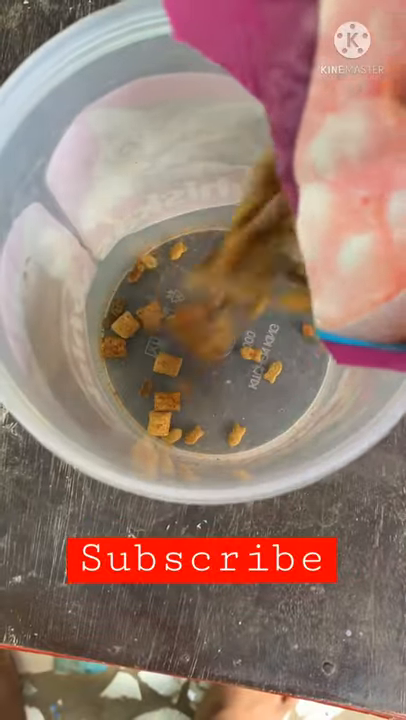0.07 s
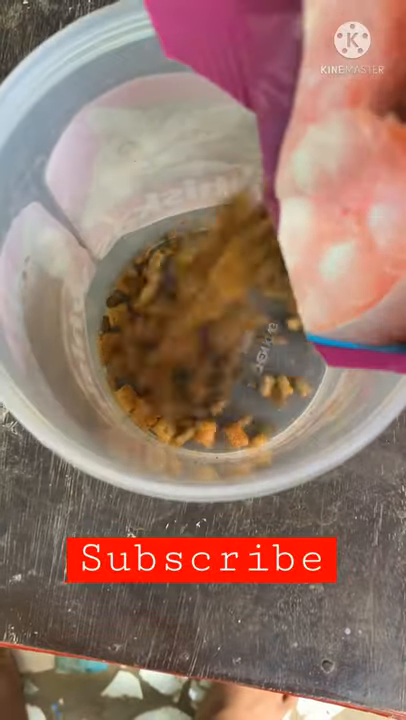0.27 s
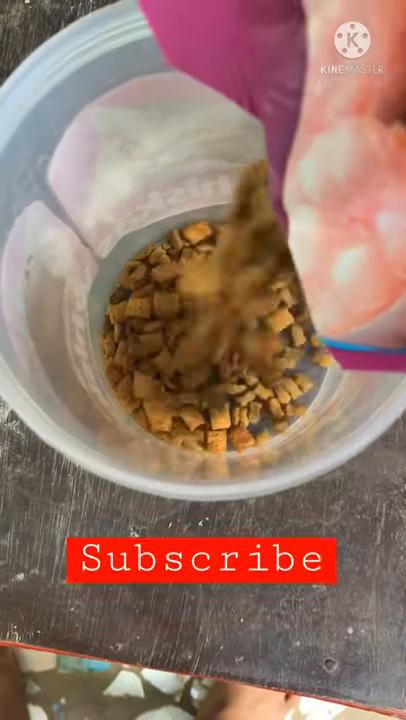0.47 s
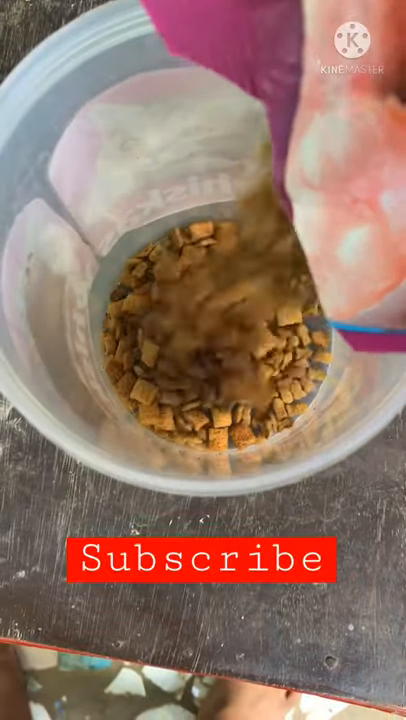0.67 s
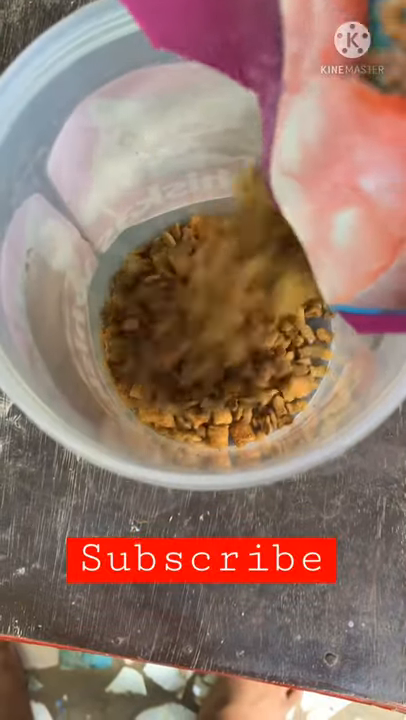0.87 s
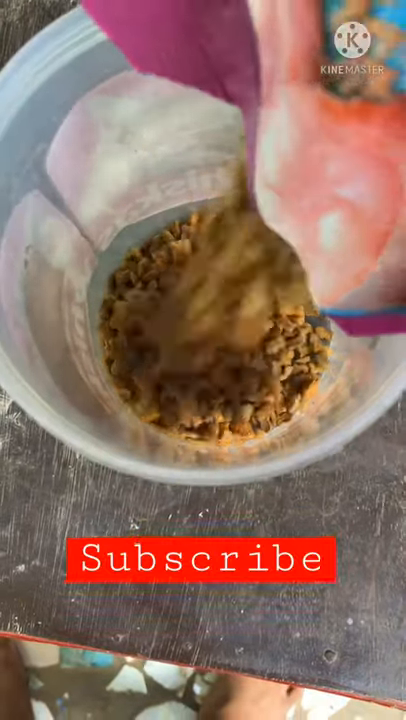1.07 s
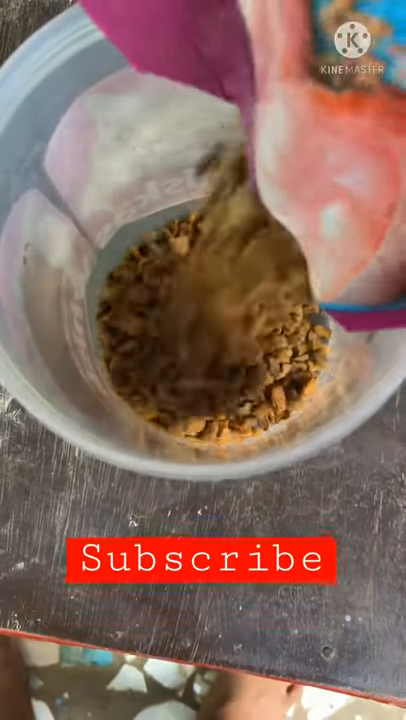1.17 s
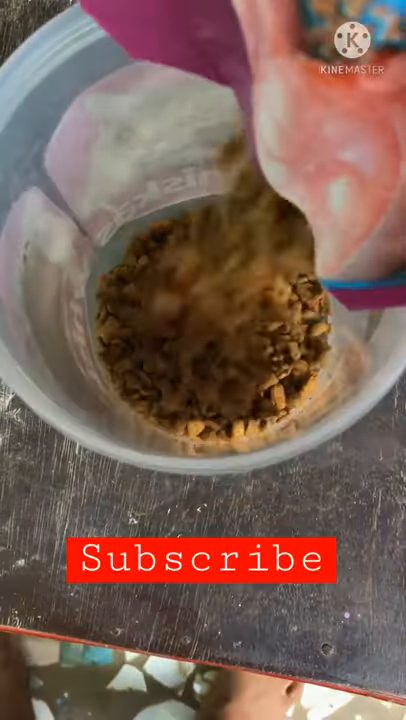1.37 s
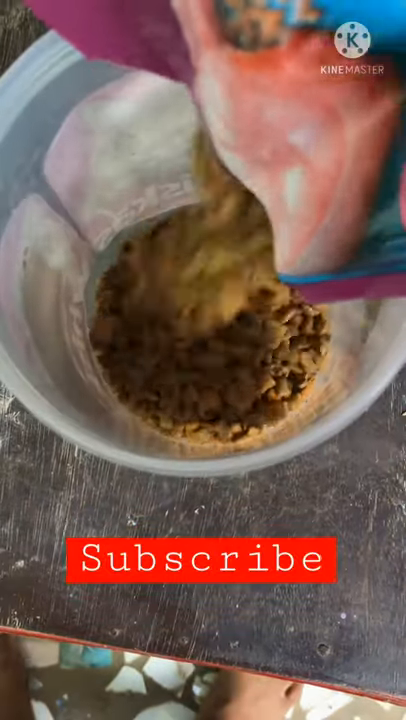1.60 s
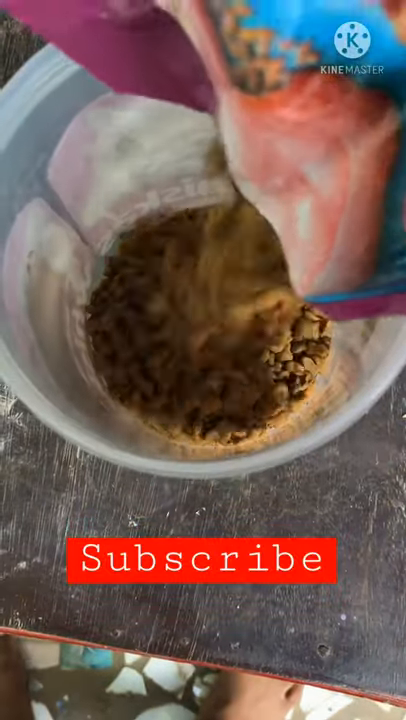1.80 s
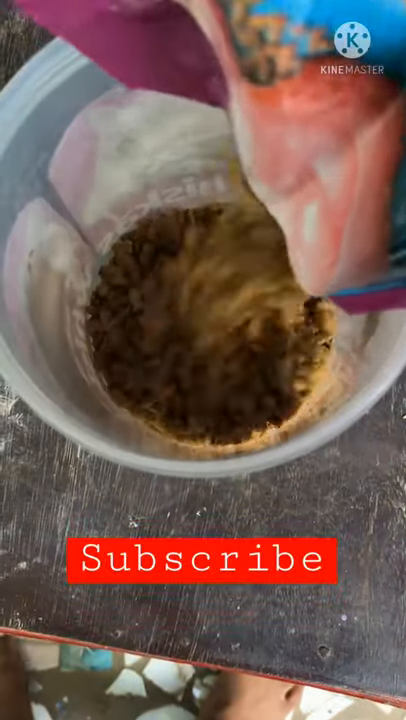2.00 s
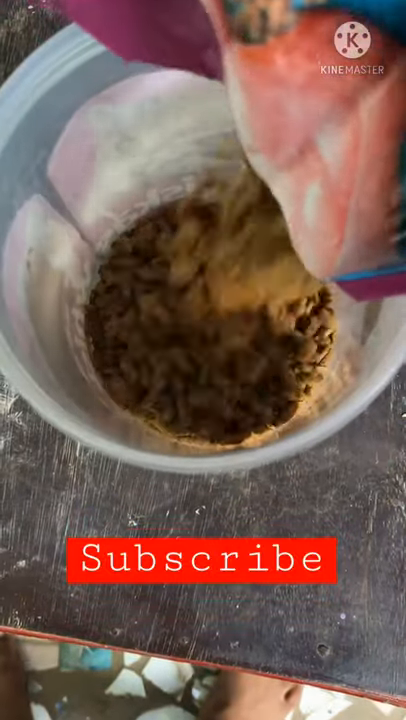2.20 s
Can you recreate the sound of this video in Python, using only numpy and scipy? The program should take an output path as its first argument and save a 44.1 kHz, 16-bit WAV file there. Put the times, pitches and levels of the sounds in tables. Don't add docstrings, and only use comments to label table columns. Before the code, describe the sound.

Hard kibble rushes into a plastic tub close to a phone microphone, first drumming hollow and harsh on the bare bottom, then pattering duller on the growing heap with small bright clicks, in a faint dry room murmur.

```python
import sys
import numpy as np
from scipy import signal
from scipy.fft import rfft, irfft, next_fast_len
from scipy.io import wavfile
from scipy.ndimage import map_coordinates

SR = 44100
rng = np.random.default_rng(int(sys.argv[2]) if len(sys.argv) > 2 else 0)


def output_pcm(signal):
    pcm = np.clip(np.atleast_2d(signal).T, -1, 1) * 32767
    wavfile.write(sys.argv[1], SR, np.round(pcm).astype(np.int16))


def volts(x):
    e = np.asarray(x, float) / 20
    return 10 ** e


N = 99225


def unit(x):
    return x / np.sqrt(np.mean(x ** 2) + 1e-20)


def filtered(x, response):
    m = next_fast_len(N + SR // 2)
    return irfft(rfft(x, m) * response(np.fft.rfftfreq(m, 1 / SR)), m)[:N]


def coloured(points):
    hz_points, db = np.transpose(points)
    return lambda hz: volts(np.interp(np.log(hz + 1), np.log(hz_points + 1), db))


def resonant(peaks):
    def response(f):
        total = 0
        for k, (centre, width, db) in enumerate(peaks):
            band = 1j * f * width
            total = total + (-1) ** k * volts(db) * band / (centre ** 2 - f ** 2 + band)
        return total
    return response


def impacts(rate, scatter_db):
    chance, side, size = rng.random((3, N))
    return unit((chance < rate / SR) * np.sign(side - 0.5) * volts(-scatter_db * np.log(size + 0.016)))


def pings(start_s, level_db, pitch_hz, t60):
    t = np.arange(600) / SR
    decay = volts(level_db[:, None] - 60 * t / t60)
    soft_start = 1 - np.exp(-t / 0.000067)
    tones = decay * np.sin(2 * np.pi * pitch_hz[:, None] * t) * soft_start
    at = np.round(start_s * SR).astype(int)[:, None] + np.arange(600)
    return np.bincount(at.ravel(), tones.ravel(), N + SR)[:N]


def lumps(rate, depth_db):
    return volts(depth_db * map_coordinates(rng.standard_normal(400), [np.arange(N) * rate / SR]))


# pitch_hz, level_db
ROOM_NOISE = [(15, -57), (25, -15.5), (130, -11.5), (217, -12), (285, -12.5), (887, -18), (1160, -15.5),
              (2050, -24), (16000, -108)]


def murmur():
    t = np.arange(N) / SR
    rise = 1 - 0.86 * np.exp(-t / 0.04)
    noise = unit(filtered(rng.standard_normal(N), coloured(ROOM_NOISE)))
    hum = unit(filtered(rng.standard_normal(N), resonant([(126.3, 5.8, 0)])))
    hum_db = -37 - 5 * t
    return rise * (volts(-32) * noise + volts(hum_db) * hum)


def room(x):
    t, t60 = np.arange(SR // 3) / SR, 0.024
    tail = rng.standard_normal(len(t)) * volts(-60 * t / t60) * (t > 0.004)
    return signal.fftconvolve(x, tail / np.linalg.norm(tail))[:N]


# start_s, flow_db, bare_bottom_db
POURING = [(.215, -58.5, 11), (.225, -41, 4.5), (.35, -30, 6.5), (.415, -34, 7.5), (.5, -30.5, 3),
           (.56, -34.5, 3.5), (.62, -35, 2.5), (.83, -35.5, 5), (1.05, -28.5, -11), (1.3, -32, -17.5),
           (1.7, -31.5, -31), (2.25, -32, -38)]


def stream():
    start_s, *columns = np.transpose(POURING)
    return [np.interp(np.arange(N) / SR, start_s, column) for column in columns]


# start_s, peak_db, pitch_hz
RIM_KNOCKS = [
    (.9657, -6, 4000),
    (.9953, -7, 1330),
    (1.9975, -15, 980),
]
# start_s, peak_db, pitch_hz
HEAP_CLICKS = [(1.1517, -11.5, 3900), (1.1778, -15, 3800), (1.2281, -10, 3800), (1.2341, -12, 3700),
               (1.2463, -12, 3970), (1.2675, -12, 3850), (1.2816, -11, 4200), (1.2993, -14, 3740.0),
               (1.3515, -7, 5680), (1.3687, -10.5, 4420), (1.3838, -10, 3600), (1.3873, -9, 3560),
               (1.4127, -12, 3380), (1.4167, -8.5, 4100), (1.4226, -14, 3980), (1.4552, -7, 4200),
               (1.5027, -13, 4240), (1.5212, -9, 3720), (1.5498, -7.5, 3850), (1.5678, -14.5, 3760),
               (1.5707, -16, 3500), (1.5937, -10.5, 3700.0), (1.6038, -18, 3900), (1.6145, -12.5, 3950),
               (1.6296, -11, 3800)]
FINAL_CLICKS = [(1.6604, -21, 2540), (1.6727, -16, 3630), (1.6788, -9, 3870), (1.6926, -11, 4560),
                (1.7219, -15, 3700.0), (1.768, -17, 4060), (1.7784, -15, 4000), (1.7864, -10, 4130),
                (1.8269, -16, 3760), (1.8549, -9, 3740), (1.8711, -11.5, 4330), (1.9289, -19, 3300),
                (1.9352, -7, 3840), (1.9399, -9, 4060), (1.9614, -11.5, 3730), (1.9968, -12.5, 3500),
                (2.0025, -22, 2770), (2.063, -19, 3360), (2.0913, -10, 4100), (2.1419, -14.5, 3360),
                (2.1459, -16, 4060), (2.179, -17.5, 3700), (2.2382, -11, 3870), (2.2422, -17, 3800.0)]
LIGHT_CLICKS = [1.0564, 1.065, 1.081, 1.0937, 1.0996, 1.135, 1.32, 1.4294, 1.4465, 1.5637, 1.6103, 1.7058,
                1.7395, 1.8065, 1.8136, 1.841, 1.8494, 1.8834, 1.893, 1.9052, 1.9163, 2.117, 2.2017]
# pitch_hz, level_db
PATTER_COLOUR = [(290, -54), (500, -0.5), (2430, -1.5), (3810, -3), (4800, -6), (5630, -6.5), (15100, -5),
                 (16000, -22)]


def heap():
    click_db, side_tone_db, click_t60, tick_hz = 2.5, -8, 0.0069, 3800
    light = [(s, -17.5, tick_hz) for s in LIGHT_CLICKS]
    start_s, peak_db, pitch_hz = np.transpose(
        list(RIM_KNOCKS) + list(HEAP_CLICKS) + list(FINAL_CLICKS) + light)
    peak_db = peak_db + click_db
    detune = np.exp(rng.normal(0, 0.16, (len(start_s), 2)))
    clicks = pings(start_s, peak_db, pitch_hz, click_t60)
    clicks += pings(start_s, peak_db + side_tone_db, 0.83 * pitch_hz * detune[:, 0], click_t60)
    clicks += pings(start_s, peak_db + side_tone_db, 1.37 * pitch_hz * detune[:, 1], click_t60 / 2)

    flow_db, _ = stream()
    place, size = rng.random((900, 2)).T
    tick_pitch = np.clip(tick_hz * np.exp(0.21 * rng.standard_normal(900)), 500, 15000)
    ticks = unit(pings(place * N / SR, -3 * np.log(size + 0.04), tick_pitch, 0.003))
    sliding = filtered(impacts(9000, scatter_db=5.0), coloured(PATTER_COLOUR))
    patter = unit(lumps(80, depth_db=3.5) * sliding)
    return clicks + volts(flow_db) * (volts(-2) * ticks + volts(3) * patter)


# start_s, peak_db, pitch_hz
PLASTIC_CRACKS = [(0.2201, -15, 9000), (0.2229, -14, 8200), (0.2274, -14, 6900), (0.2542, -14, 7140),
                  (0.2676, -14, 6800), (0.2707, -13, 6400), (0.2837, -9, 8900), (0.2972, -7, 8900),
                  (0.3021, -6, 7400), (0.305, -11, 8400), (0.3257, -7, 10700), (0.3299, -2, 12300),
                  (0.342, -5, 8600), (0.3467, -1, 8400), (0.381, -5, 7750), (0.395, -8, 7200),
                  (0.4414, -7, 9000), (0.4647, -9, 13200), (0.5178, -9, 13300), (0.5252, -5, 7000),
                  (0.5637, -16, 7300), (0.5823, -9, 7150), (0.5889, -11, 9000), (0.593, -4, 12800),
                  (0.6009, -7, 7800), (0.606, -10, 7300), (0.6252, -15, 7000), (0.6327, -13, 7500),
                  (0.6552, -6, 7400), (0.6643, -9, 6200), (0.6851, -4, 7400), (0.6876, -13, 9800),
                  (0.695, -2, 6150), (0.7191, -12, 8500), (0.7449, -10, 6200), (0.7987, -13, 6000),
                  (0.8893, -11, 6300), (0.9565, -19, 8500), (0.966, -7, 5960), (0.9839, -10, 8900),
                  (0.9954, 1, 8950), (1.039, -8.5, 9500)]
HEAP_CRACKS = [(1.1779, -9, 6000), (1.2281, -13, 6700), (1.2342, -12, 6100), (1.2816, -12, 8500),
               (1.2854, -16, 6300), (1.3516, -7, 5650), (1.3877, -13, 6700), (1.4226, -21, 5900),
               (1.4464, -22, 6700), (1.5026, -17, 8050), (1.5215, -12, 6300), (1.5678, -8, 6400),
               (1.5708, -8, 5900), (1.6039, -18, 6700), (1.6145, -16, 8000), (1.6604, -14, 5900),
               (1.6728, -17, 6000), (1.679, -5, 5800), (1.6929, -9, 6060), (1.6962, -7, 6300),
               (1.9291, -14, 8000), (1.9614, -12, 6700), (1.9968, -15, 8700), (2.0033, -16, 8260),
               (2.0916, -12, 6500), (2.1422, -17, 6100)]


def corners():
    start_s, peak_db, pitch_hz = np.transpose(list(PLASTIC_CRACKS) + list(HEAP_CRACKS))
    tone = pings(start_s, peak_db + 5.5, pitch_hz, 0.0017)
    burst = np.abs(pings(start_s, peak_db - 0.5, pitch_hz / 8, 0.0043)) * rng.standard_normal(N)
    return tone + filtered(burst, lambda f: 1j * f / (1j * f + 4000))


# start_s, level_db, length_s
STRAY_PIECES = [
    (.0004, -9.5, 0.0041),
    (.0593, -24, 0.0025),
    (.0684, -24, 0.00092),
    (.0816, -28, 0.0012),
    (.0858, -38, 0.00092),
    (.1032, -21, 0.0016),
]
# start_s, level_db, length_s
FIRST_HANDFULS = [(0.2198, 4.5, 0.0021), (0.2274, -3, 0.0043), (0.2463, 3, 0.0038), (0.2524, 1, 0.0048),
                  (0.2674, 1.5, 0.0095), (0.2733, -7.5, 0.0021), (0.2824, 0, 0.0024), (0.2907, 0.5, 0.0075),
                  (0.3016, -1.5, 0.0034), (0.3249, -1.5, 0.0059), (0.3329, -4, 0.009), (0.3388, -6, 0.0063),
                  (0.3468, 1, 0.0025), (0.356, 2, 0.0012), (0.3633, -9, 0.011), (0.3731, -15, 0.014),
                  (0.382, -4, 0.0063), (0.3915, -3, 0.0026), (0.405, -10, 0.003), (0.4283, -9, 0.0082),
                  (0.4386, -2, 0.0089), (0.4504, -2.5, 0.009), (0.462, -6, 0.0057), (0.4724, -15, 0.0036),
                  (0.4838, -21, 0.0028)]
LATER_HANDFULS = [(0.5013, -15, 0.002), (0.5067, -8.5, 0.0049), (0.5233, -7, 0.01), (0.5355, -11.5, 0.0049),
                  (0.5634, -7, 0.0028), (0.5819, -6, 0.007), (0.5974, -9, 0.0036), (0.6056, -6.5, 0.003),
                  (0.6246, -3, 0.002), (0.6322, -6, 0.0017), (0.6462, -11, 0.0023), (0.6542, -3.5, 0.0013),
                  (0.663, -3, 0.0035), (0.683, -2.5, 0.0057), (0.6945, -3, 0.0022), (0.7186, -8.5, 0.0056),
                  (0.7338, -5, 0.0019), (0.7408, -3.5, 0.002), (0.7516, -8, 0.0051), (0.767, -14, 0.0032),
                  (0.7983, -0.5, 0.002), (0.8107, -3, 0.0027), (0.8259, -7, 0.0027), (0.8325, -12.5, 0.01),
                  (0.8889, -9.5, 0.0018), (0.9236, -5.5, 0.002), (0.9559, -8.5, 0.0015),
                  (0.9833, -13.5, 0.0054), (1.02, -13, 0.0067), (1.0386, -5.5, 0.0038)]
# start_s, level_db
AIR_PUSHES = [(0.2294, -4), (0.2633, -8), (0.301, -12), (0.334, -25), (0.355, -1), (0.3868, -14),
              (0.4495, -1.5), (0.5272, -10), (0.6638, -1.5), (0.6873, -7.5), (0.7228, -8.5), (0.7989, -5),
              (0.925, -10), (0.9567, -11.5), (1.07, -15), (1.16, -16), (1.239, -17), (1.28, -13),
              (1.345, -18), (1.556, -20)]
# pitch_hz, width_hz, level_db
AIR_MODES = [(184, 51, -18.5), (321, 74, -10.5), (416, 33.2, -2.5), (626.6, 47.5, -12)]
# pitch_hz, width_hz, level_db
WALL_MODES = [(967, 63, -7.5), (1393, 118, -8.5), (1940, 320, -9.5), (2155, 150, 4.5), (2875, 347, -6),
              (3222, 173, -2.5), (3700, 360, -8.5), (4270, 390, -6.5), (5480, 1270, -16),
              (8600, 1230, -13.5)]
# pitch_hz, level_db
CRACK_COLOUR = [(710, -47), (1200, -25), (1560, -12), (2150, -1), (2480, -21), (8440, -15), (16000, -17)]


def tub():
    t = np.arange(SR // 30) / SR
    blows, pushes = np.zeros(N + SR), np.zeros(N)
    grit = np.pad(impacts(5000, scatter_db=2.5), (0, SR))
    attack = 1 - np.exp(-t / 0.00045)
    for start_s, level_db, length_s in list(STRAY_PIECES) + list(FIRST_HANDFULS) + list(LATER_HANDFULS):
        at = round(start_s * SR)
        shape = attack * np.exp(-(t / np.clip(0.86 * length_s, 0.0003, 0.012)) ** 2)
        blows[at:at + len(t)] += volts(level_db) * shape * grit[at:at + len(t)]
        blows[at] += volts(level_db) * 3.7 * rng.choice([-1, 1])
    blows = blows[:N]
    for start_s, level_db in AIR_PUSHES:
        pushes[round(start_s * SR)] = volts(level_db + 41.5)

    flow_db, bare_db = stream()
    rattle = volts(flow_db + 11.5) * lumps(110, depth_db=3.5) * impacts(3000, scatter_db=4.5)
    pushes += volts(8.5) * (1.3 * blows + volts(11.5 + 0.38 * bare_db) * rattle)
    blows = blows + volts(bare_db) * rattle

    walls = volts(10.5) * filtered(blows, resonant(WALL_MODES))
    air = filtered(pushes, resonant(AIR_MODES))
    crack = volts(4) * filtered(blows, coloured(CRACK_COLOUR))
    return walls + air + crack


def scene():
    food = tub() + heap() + corners()
    return (food + volts(-18) * room(food) + murmur())[None]


def low_pass(x):
    return signal.sosfilt(signal.butter(12, 16530, fs=SR, output="sos"), x)


# pitch_hz, width_hz, depth (0-1)
MIC_NOTCHES = [(4950, 190, 0.36), (10500, 520, 0.34)]


def record(dry):
    def microphone(f):
        response = (f < 15900) * (1j * f / (1j * f + 30)) ** 2
        for centre, width, depth in MIC_NOTCHES:
            response = response * (1 - depth * np.exp(-((f - centre) / width) ** 2))
        return response

    x = filtered(dry[0], microphone)
    x = x / (1 + np.abs(x / 0.83) ** 20) ** (1 / 20)
    return low_pass(x[None])


dry = scene()
out = record(dry)
output_pcm(out)
```